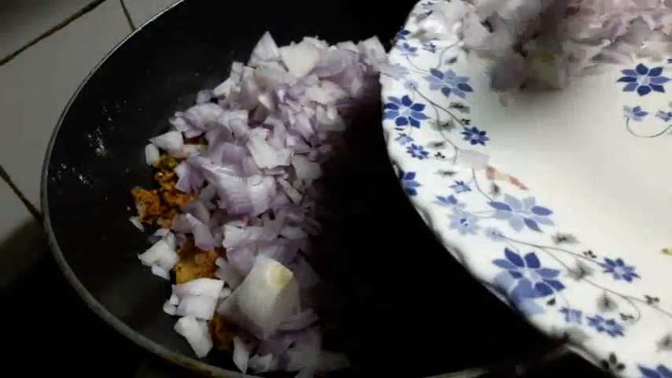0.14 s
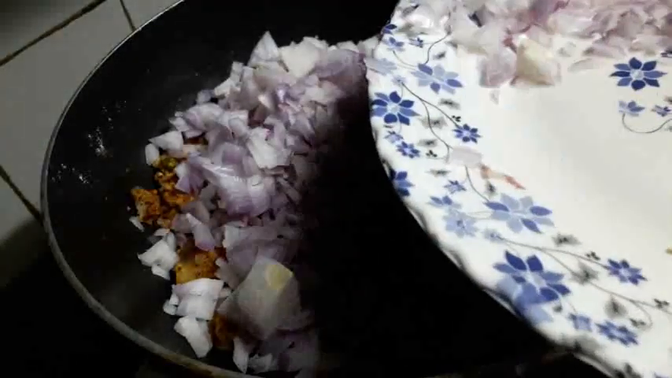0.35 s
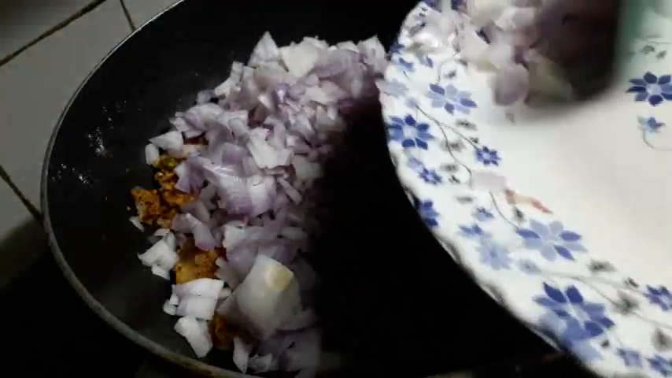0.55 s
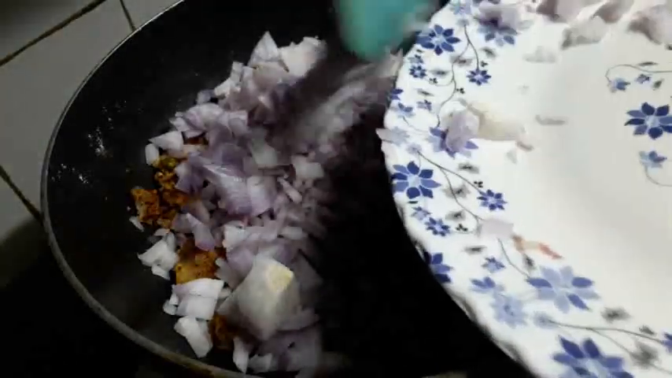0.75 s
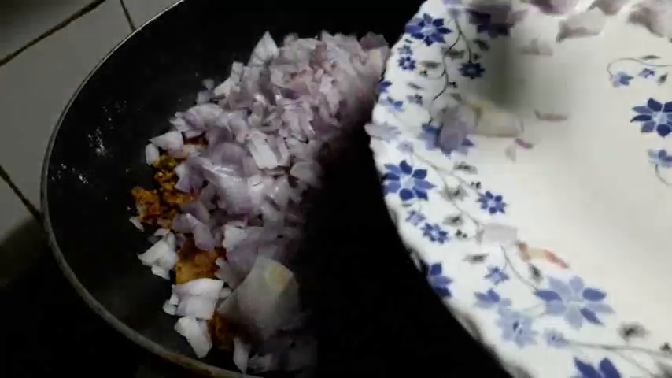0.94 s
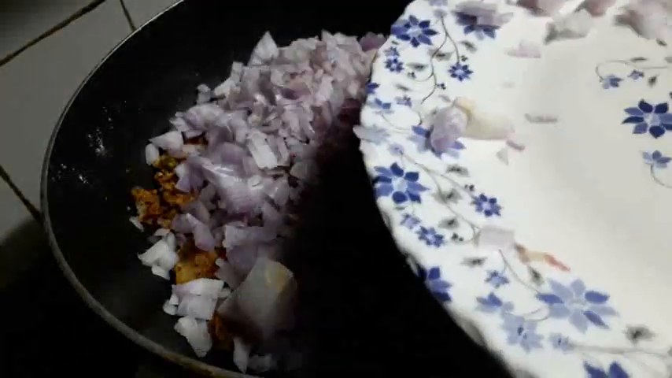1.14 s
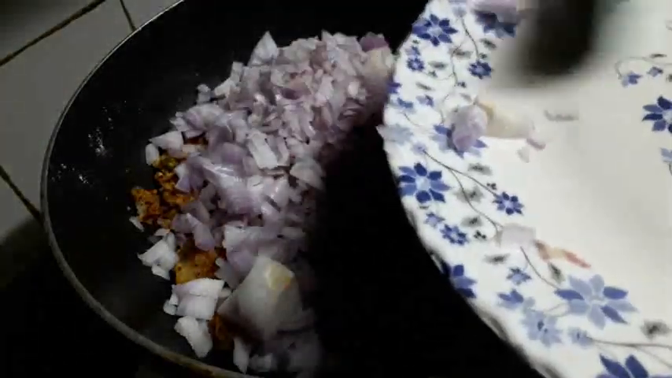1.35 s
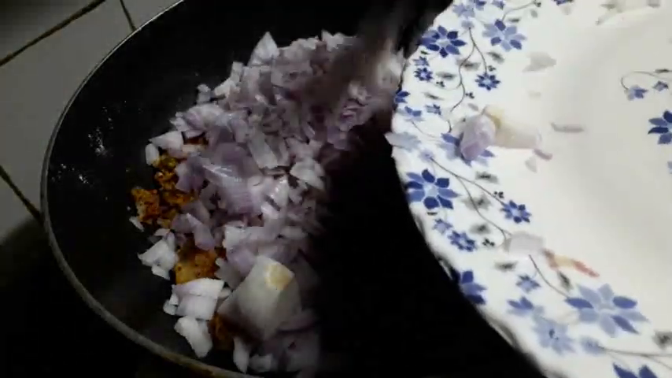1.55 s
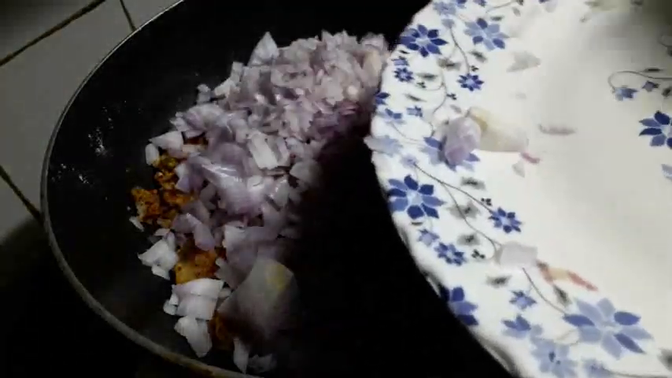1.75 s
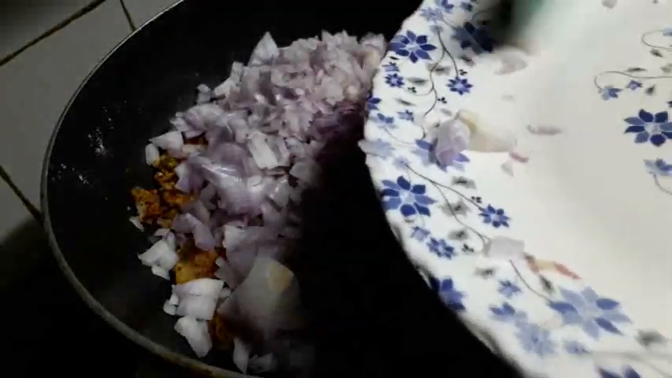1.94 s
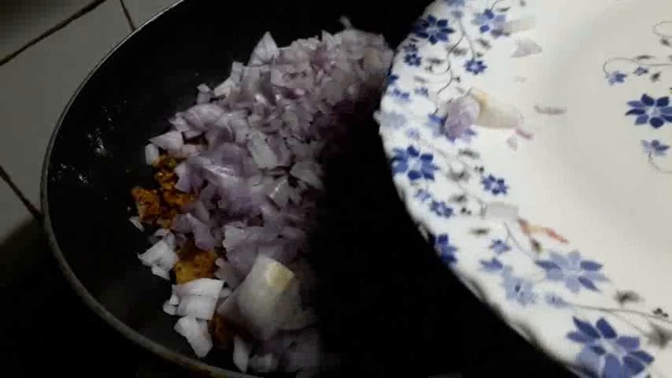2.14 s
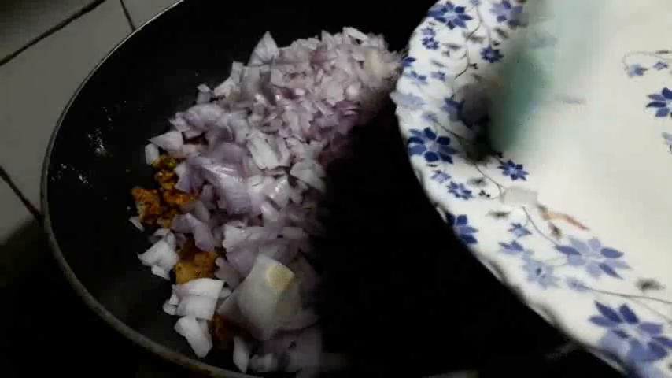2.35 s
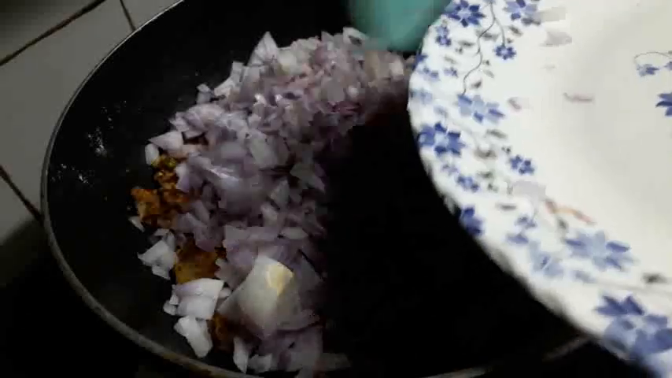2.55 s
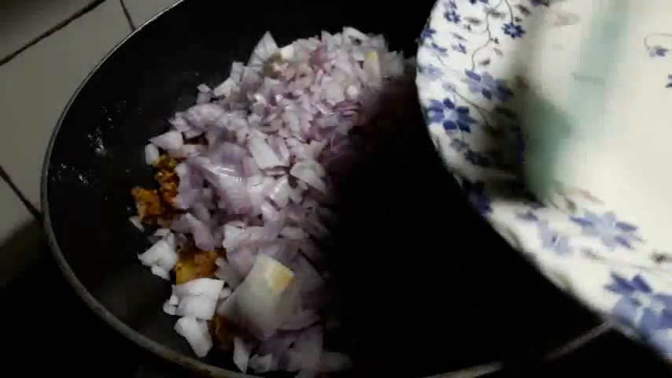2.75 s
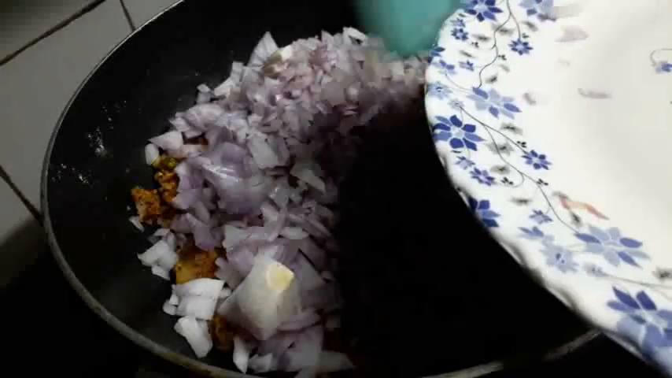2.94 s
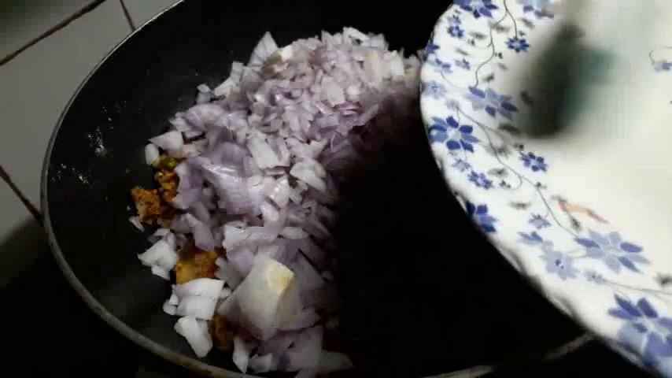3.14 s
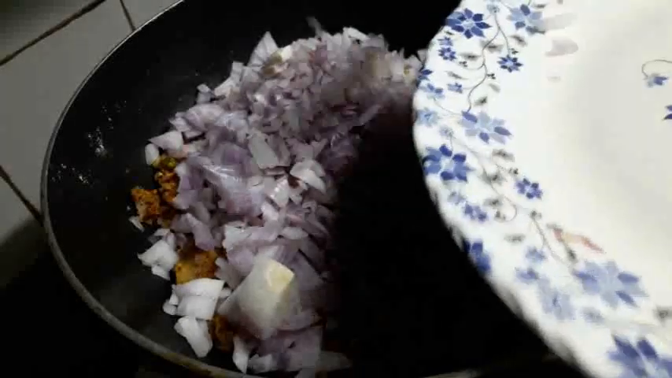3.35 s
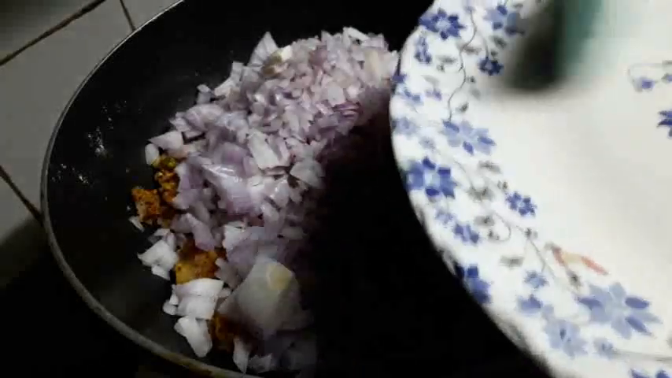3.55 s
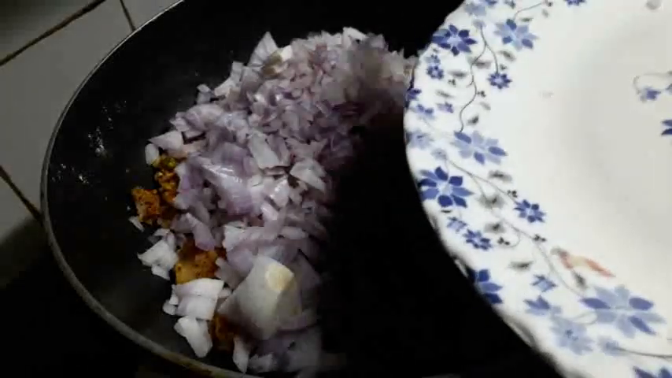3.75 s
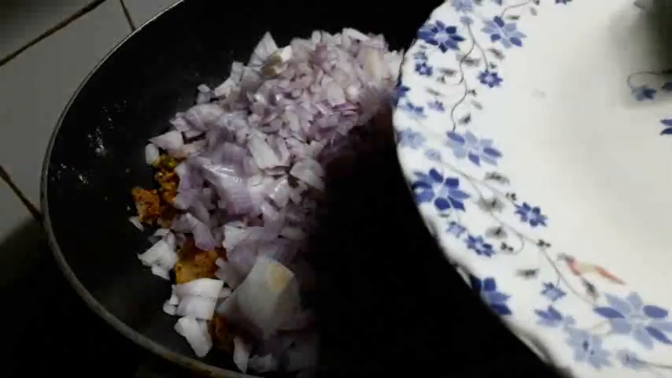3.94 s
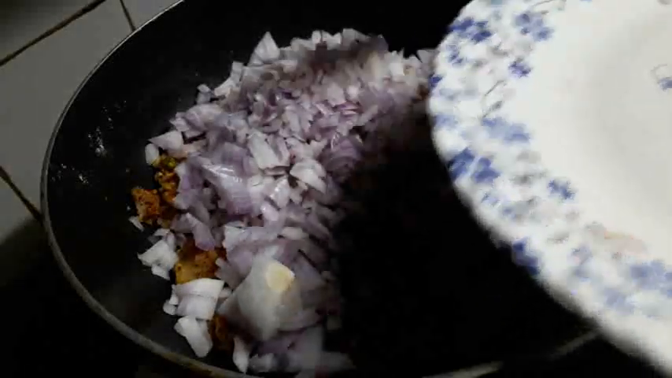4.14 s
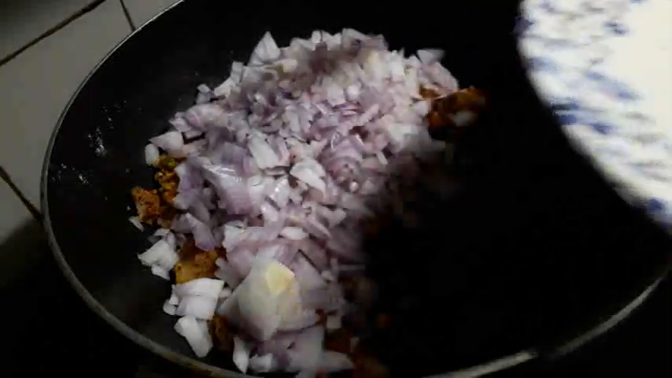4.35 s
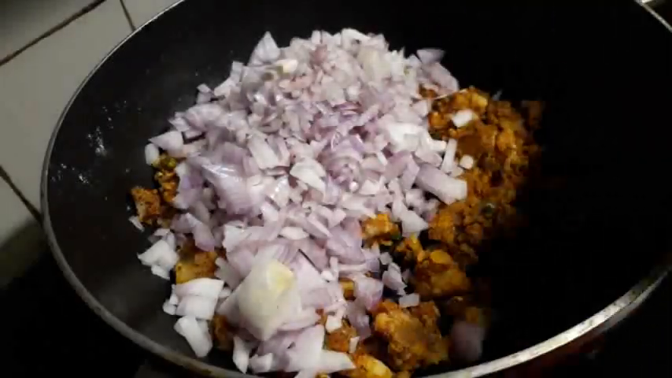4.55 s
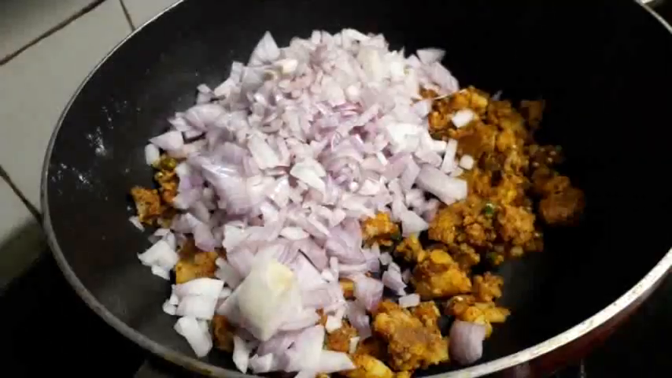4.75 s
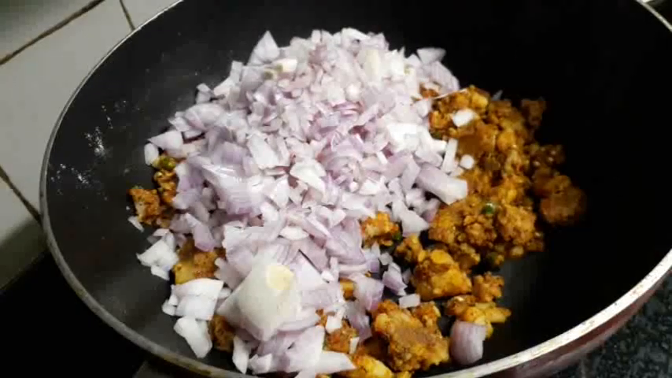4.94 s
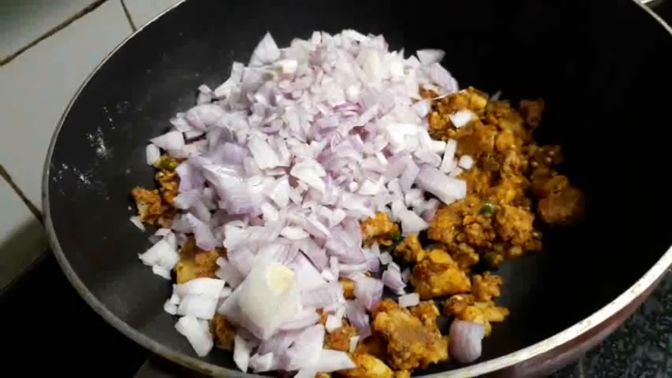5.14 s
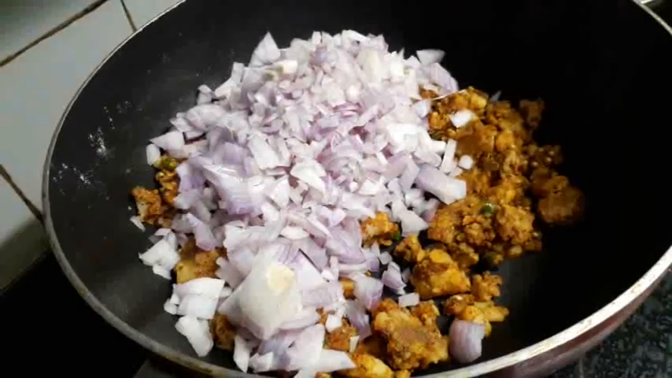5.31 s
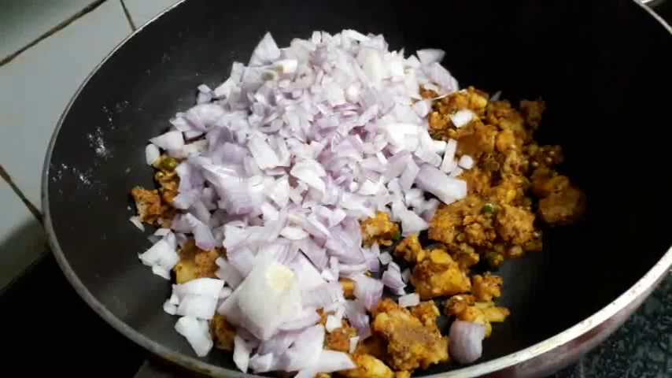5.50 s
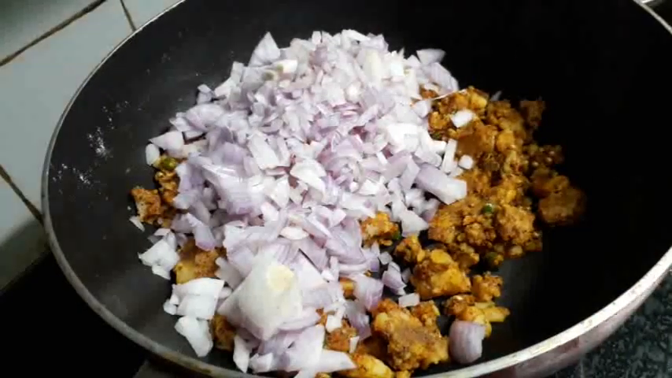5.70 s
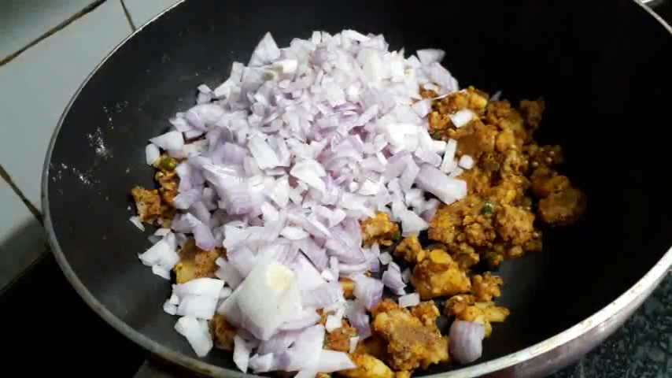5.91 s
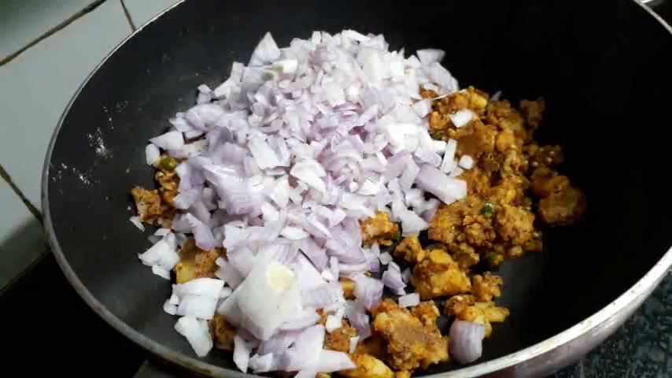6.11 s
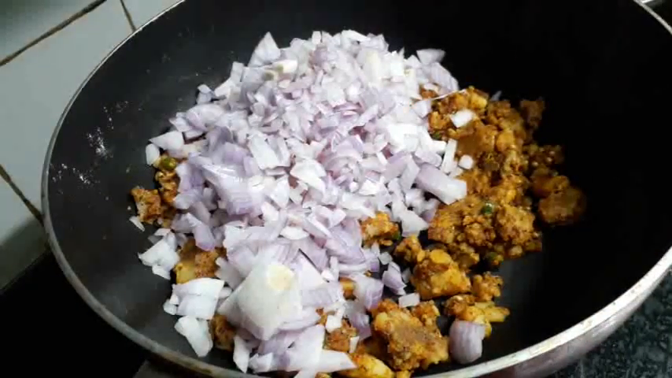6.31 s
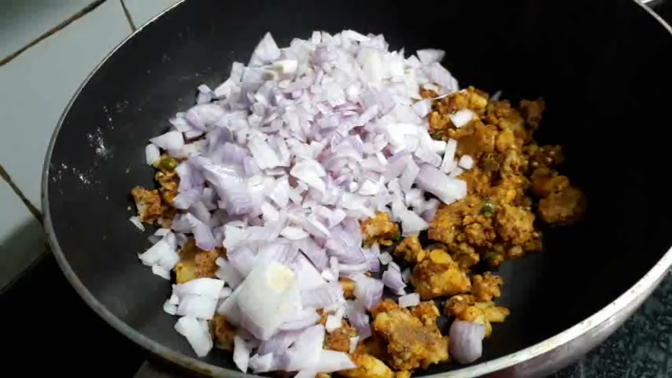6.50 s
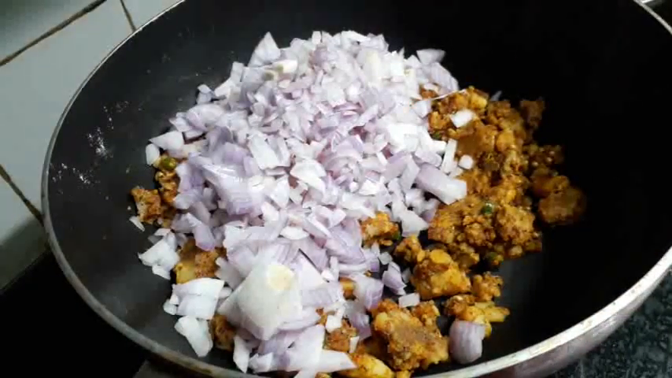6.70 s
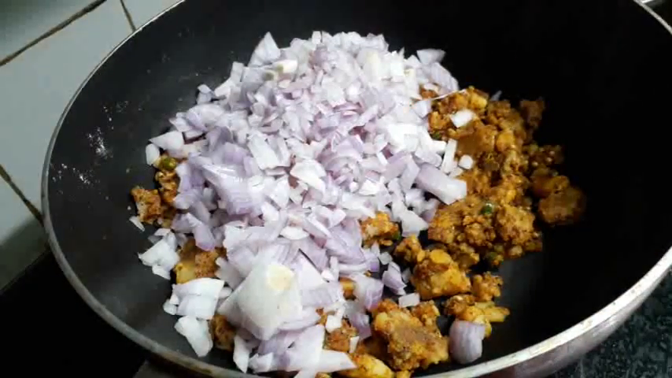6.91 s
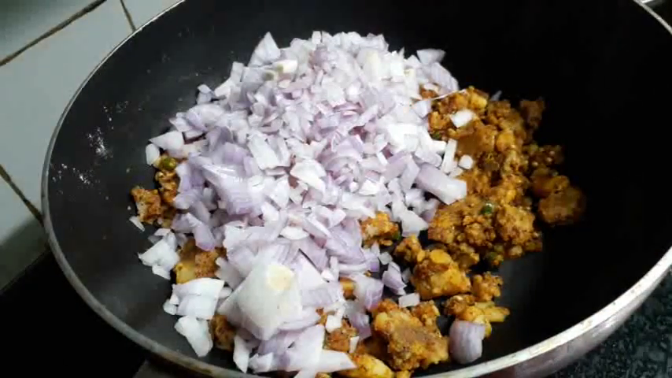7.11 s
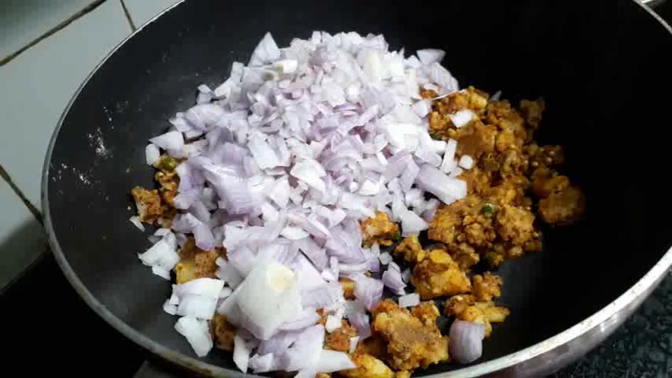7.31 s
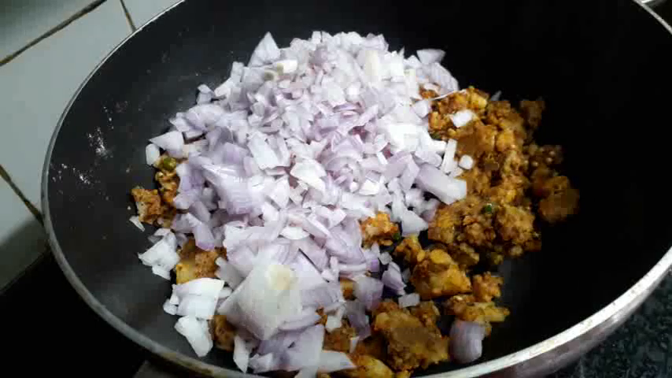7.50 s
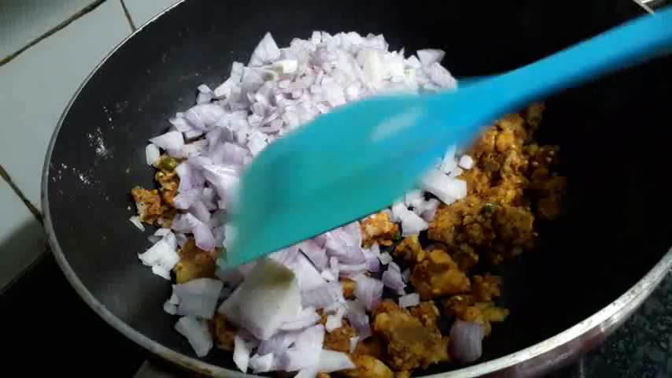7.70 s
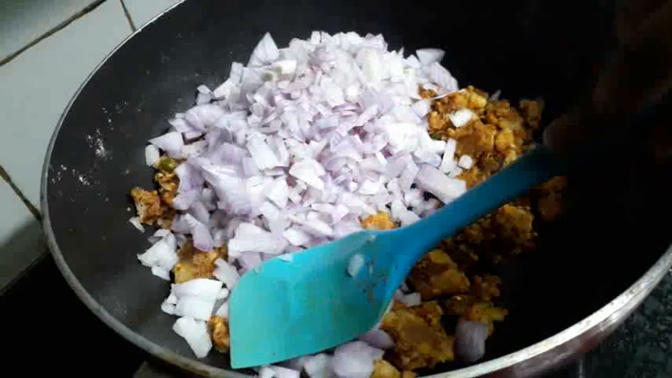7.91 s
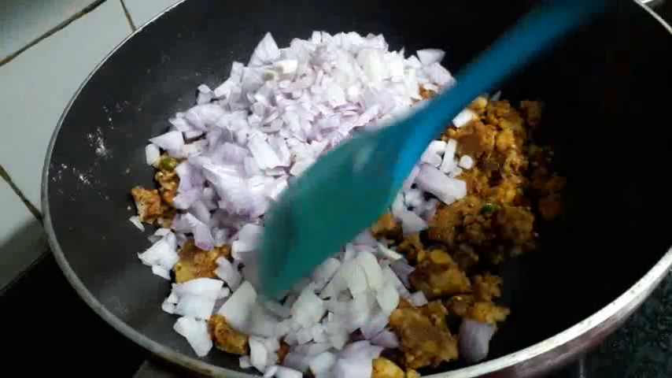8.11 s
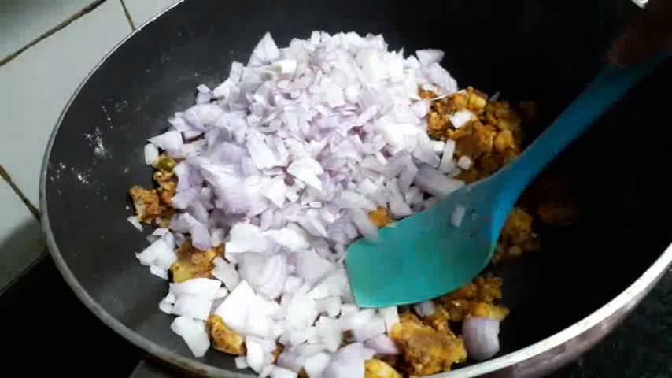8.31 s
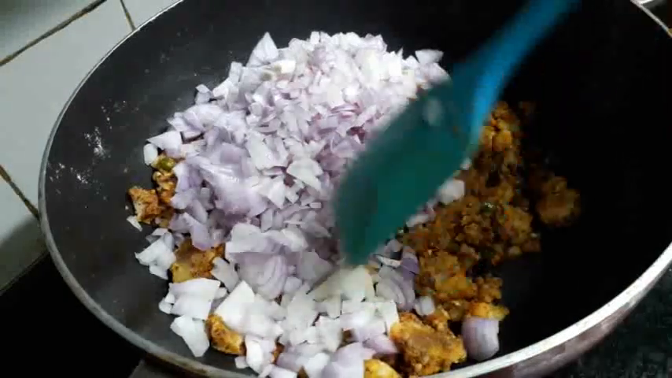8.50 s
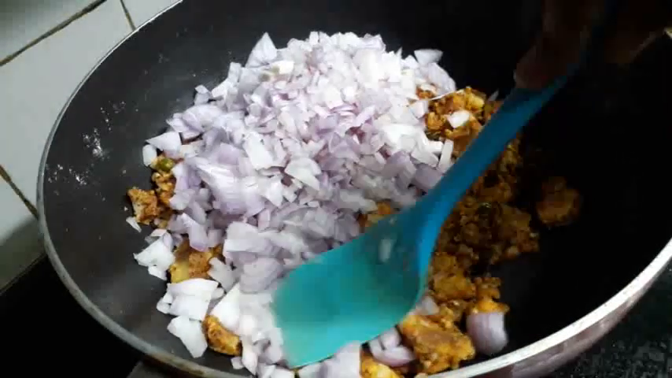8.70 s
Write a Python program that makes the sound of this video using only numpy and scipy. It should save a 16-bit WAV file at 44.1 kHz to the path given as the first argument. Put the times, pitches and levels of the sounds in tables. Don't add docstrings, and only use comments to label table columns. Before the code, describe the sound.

A low fan drone and a faint, fine-grained oil sizzle run throughout, close up in a small tiled kitchen. A soft spatula brushes a plate and scrapes it grittily around 0.4 s; a loud ceramic knock rings briefly at 0.7 s, followed by an oil spit at 0.8. Gentle landings and short scrapes continue from 1.1 to 2.3 s. Hard clanks strike at 2.4, 2.8 and 3.2 s, the last with a small bounce, among softer taps at 3.1, 3.5 and 3.9. A weaker rim double-knock and scrape come at 4.05. Near 4.5 s the plate lifts and the hiss brightens. A soft touch at 5.4 and faint raps at 5.8-5.9 precede a sharp spit at 6.7. A slide from 7.0 meets a loud dry rap at 7.2. From 7.6, thuds and crunches prod the onions, strongest at 8.7, amid frequent crackling spits from 7.9 to 8.6.

```python
import sys
import numpy as np
from scipy import signal
from scipy.fft import rfft, irfft, next_fast_len
from scipy.io import wavfile
from scipy.ndimage import uniform_filter1d

SR = 44100
rng = np.random.default_rng(int(sys.argv[2]) if len(sys.argv) > 2 else 0)


def transcribe(u):
    v = np.clip(np.atleast_2d(u).T, -1, 1)
    q = np.round(v * 32767).astype(np.int16)
    wavfile.write(sys.argv[1], SR, q)


def makeup_ratio(level_db):
    decades = np.asarray(level_db, float) / 20
    return 10 ** decades


N = 390637
T = np.arange(9000) / SR
LIFT_S = 4.48

# frequency in Hz, level in dB per Hz.
FAN_COLOUR = [(15, -47), (25, -40), (54, -6.5), (75, -27), (92, -8), (112, 4.5), (140, -3.5), (188, 0),
              (238, -12), (437, -12.5), (534, -25.5), (666, -14), (1290, -24.5), (2000, -23.5), (2600, -76),
              (4400, -120)]
# frequency in Hz, width in Hz, level in dB.
HUM_TONES = [(48.4, 3, -69.5), (107.7, 9.3, -61.5), (147.6, 6.8, -63)]
# time in seconds, level in dB.
FRY_VIGOUR = [(0.0, -52), (0.67, -47.5), (1.3, -50), (2.29, -47), (3.8, -50.5), (4.46, -48.5), (6.0, -47.5),
              (6.69, -49), (7.18, -46.5), (7.45, -48.5), (8.86, -47)]
# frequency in Hz, level in dB per Hz.
FRY_COLOUR = [(530, -4.5), (900, -9), (1290, -10.5), (2040, -6), (4800, 3.5), (8250, 2), (10400, -11),
              (12400, -8), (15100, -19.5), (16000, -42)]
# frequency in Hz, t60 in seconds, level in dB when struck at the centre, half way,
# at the rim, and when touched softly.
PLATE_MODES = [(147, 0.044, -9, -11, -13, -13), (269, 0.04, -12, -9, -8, -13),
               (350.6, 0.17, -4.5, -8, -8.5, 0.0), (469, 0.079, -9.5, -8.5, -23, -8),
               (590.5, 0.12, -10, -5, -6, -7), (724, 0.03, 8, 3.5, 2.5, -1),
               (812, 0.083, -2, -6, -2, -13.5), (871, 0.095, -4, -8.5, -8, -18),
               (1105, 0.17, -26, -19, -15, -29), (1373, 0.06, -2, -1.5, 4.5, -16),
               (1587, 0.052, -32, -4.5, -7, -27), (1882, 0.069, 0.5, 3, 0.5, -19),
               (2033, 0.08, -9, -8.5, -6, -24.5), (2432, 0.045, 6, -2.5, -22, -26)]
# frequency in Hz, t60 in seconds, level in dB.
UPPER_MODES = [(1604, 0.066, -16), (2264, 0.044, -13), (2870, 0.055, -11.5), (3150, 0.065, -12),
               (3505, 0.033, -7.5), (3804, 0.11, -18.5), (4510, 0.032, -14), (5450, 0.076, -17.5),
               (5905, 0.059, -14)]
UPPER_GAIN_DB = [-2.5, -1, -6, -18]
MODE_FAMILIES = [(1000, 9000), (0, 300), (300, 400), (400, 1000)]
# time in seconds, body level in dB, upper modes in dB.
BRUSHES = [(0.158, -53, -39), (0.4953, -54, -44), (0.6095, -47, -46), (1.254, -54, -38),
           (1.3486, -56, -45.5), (1.4347, -63, -53), (1.5908, -44.5, -42), (1.6706, -49, -47),
           (1.7739, -39.5, -40), (1.8923, -51, -38), (1.931, -56, -42), (2.657, -48, -33.5),
           (5.4396, -52, -32.5), (3.4759, -39, -44), (3.499, -46.5, -42), (4.175, -50, -45),
           (4.6013, -42, -43), (4.6571, -52, -37.5)]
# time in seconds, flexing level in dB, body and thump in dB
LANDINGS = [
    (0.3189, -42.5, 1, -3.5, 0.7),
    (1.1115, -29.5, -8, -12, 1.1),
    (1.75, -26.5, -9, -18, 1.05),
    (2.2503, -31.5, -0.5, -6.5, 1.6),
    (2.6569, -40, -5, 5, 0.91),
    (3.055, -26, -6.5, -13.5, 1.75),
    (3.4517, -25, -10, -14, 1.13),
    (3.8736, -32.5, -5, -14, 1.1),
    (3.8971, -39, -13, -15, 1.05),
    (5.439, -27, -0.5, -7, 1.4),
]
# start, hardest moment and end in seconds, level in dB at the hardest.
PLATE_STROKES = [
    (0.36, 0.44, 0.58, -45.5),
    (0.6, 0.63, 0.69, -56),
    (1.17, 1.2, 1.26, -47),
    (1.24, 1.262, 1.42, -54),
    (1.42, 1.44, 1.4, -54),
    (1.84, 1.895, 2.02, -51),
    (2.27, 2.285, 2.6, -51.5),
    (3.99, 4.03, 4.5, -50),
    (4.58, 4.606, 4.27, -44),
    (4.64, 4.666, 4.45, -53),
]
# frequency in Hz, width in Hz, level in dB.
RUBBED_PLATE = [(353, 130, 0.5), (600, 100, -4), (760, 91, 2.5), (970, 180, -3.5), (1265, 310, -4.5),
                (1430, 120, -4), (1860, 55, -1), (2430, 180, -10.5)]
# time in seconds, level in dB, centre in Hz, t60 in seconds.
SPITS = [(0.572, -37, 3300, 0.02), (0.5831, -33, 3150, 0.028), (0.8089, -20, 5500, 0.048),
         (4.8183, -23, 6260, 0.03), (5.66, -32, 4000, 0.054), (6.673, -17, 8900, 0.069),
         (6.7313, -31, 5750, 0.03), (7.148, -25, 9500, 0.079), (7.2933, -36, 5700, 0.025),
         (7.446, -31, 6000, 0.033), (7.592, -28.5, 5040, 0.069), (7.953, -24, 5470, 0.03),
         (8.019, -37, 5740, 0.03), (8.04, -34, 4090, 0.026), (8.105, -16, 3900, 0.021),
         (8.131, -27, 5450, 0.052), (8.149, -16.5, 9900, 0.061), (8.285, -44, 3000, 0.03),
         (8.284, -22.5, 4300, 0.023), (8.319, -26, 6480, 0.023), (8.4761, -26, 5920, 0.037),
         (8.5865, -19.5, 6450, 0.029)]
# time in seconds, level in dB, crack level in dB, share of ring left
KNOCKS = [
    (0.677, 1, -19, 1, 0.05),
    (2.3876, -1.5, -18, 1, 0.89),
    (2.807, -1, -9.5, 0.95, 0.93),
    (3.1684, 0.5, -11.5, 1, 1.16),
    (3.193, -14, -30, 0.99, 1.5),
    (4.045, -10, -31.5, 0.86, 2.2),
    (4.057, -13.5, -39, 0.93, 2.13),
]
# time in seconds, level in dB, crack level in dB, pitch factor of the part that lands.
RAPS = [
    (5.8326, -35, -36, 1.17),
    (5.899, -33.5, -38, 0.8),
    (7.2176, -0.5, -25, 1.001),
]
# frequency in Hz, level in dB, t60 in seconds.
SPATULA_MODES = [(290, -15.5, 0.073), (1070, -20, 0.069), (1372, -1.5, 0.069), (1466, 3, 0.026),
                 (1550, -5.5, 0.028), (1717, -4, 0.064), (1825, -4, 0.05), (1990, -1, 0.033),
                 (2500, -23, .040), (2488, -1, 0.035), (3050, -16, 0.041), (3440, -19, 0.029),
                 (4105, -9., 0.032), (6240, -16, 0.036)]
# start, hardest moment and end in seconds, level in dB at the hardest.
WORKTOP_STROKES = [
    (7.0, 7.1, 7.135, -49),
    (7.128, 7.142, 7.2, -41),
]
# frequency in Hz, width in Hz, level in dB.
WORKTOP = [(1450, 270, -2), (1900, 400, -0.5), (2500, 500, -5), (3300, 900, -0.5)]
# time in seconds, level in dB, length in seconds, crunch level in dB,
# crispness in dB.
PRODS = [
    (7.597, -41, 0.055, -3, 0),
    (7.827, -27.5, 0.033, 0, -9.5),
    (8.071, -28, 0.049, -4.5, -8),
    (8.21, -38, 0.052, -10, -14),
    (8.271, -33, 0.042, 1, -22),
    (8.659, -20.5, 0.049, -5, -16),
    (8.762, -24.5, 0.055, -1.5, -6.5),
]
# frequency in Hz, width in Hz, level in dB.
PAN = [(288, 87, -4), (494, 35, 2), (730, 170, -3.5), (960, 48, 5), (1255, 220, -5.5), (1530, 190, -4),
       (2320, 1640, -16)]
# frequency in Hz, t60 in seconds.
KITCHEN = [(350, 0.3), (1500, 0.14), (5000, 0.15)]
# frequency in Hz, share of moments before 4.48 s, # share
FLIPPED = [(8600, .02, .03), (9300, .35, .06), (10700, .68, .16), (12700, .68, .1), (13400, .45, .3),
           (14100, .15, .65), (14800, .08, .75)]


def level(x, db):
    return x * makeup_ratio(db) / np.sqrt(np.mean(x ** 2))


def band(x, lo_hz, hi_hz):
    return signal.sosfilt(signal.butter(2, [lo_hz, min(hi_hz, 0.45 * SR)], "band", fs=SR, output="sos"), x)


def colour(x, points):
    hz, db = np.transpose(points)
    size = next_fast_len(len(x))
    f = np.maximum(np.fft.rfftfreq(size, 1 / SR), 1)
    gain = makeup_ratio(np.interp(np.log(f), np.log(hz), db))
    return irfft(rfft(x, size) * gain, size)[:len(x)]


def resonate(x, peaks):
    out = 0
    for k, (hz, width_hz, db) in enumerate(peaks):
        out = out + (-1) ** k * makeup_ratio(db) * signal.lfilter(*signal.iirpeak(hz, hz / width_hz, SR), x)
    return out


def walk(rate_hz):
    k = int(SR / rate_hz)
    steps = np.repeat(rng.standard_normal(N // k + 1), k)
    return uniform_filter1d(uniform_filter1d(steps, k), k)[:N]


def grit(rate_hz, spread_db, count):
    size = makeup_ratio(spread_db * np.minimum(rng.exponential(size=count), 3.5))
    return (rng.random(count) < rate_hz / SR) * size * rng.standard_normal(count)


def add(track, s, x):
    i = int(s * SR)
    track[i:i + len(x)] += x[:N - i]


def fade(t60_s):
    return np.exp(-np.log(1000) * T / np.maximum(t60_s, 0.003))


def ring(hz, db, t60_s, chance, spot_db):
    hz, db, t60_s, a, b = (np.reshape(v, (-1, 1)) for v in (hz, db, t60_s, *chance))
    sign = (-1) ** np.arange(len(hz))[:, None]
    muffle = 0.086 + 1.5 * np.exp(-(T / (0.38 * np.maximum(t60_s, 0.003))) ** 2)
    wave = np.sin(2 * np.pi * hz * (1 + 0.004 * b) * T)
    x = np.sum(sign * makeup_ratio(db + spot_db * a) * fade(t60_s) * muffle * wave, axis=0)
    x = x * np.minimum(T / 0.00067, 1)
    return x / np.abs(x).max()


def crack(lo_hz, hi_hz, t60_s, tail_db, tail_t60_s):
    decay = fade(t60_s) + makeup_ratio(tail_db) * fade(tail_t60_s)
    x = band(rng.standard_normal(len(T)), lo_hz, hi_hz) * decay
    return x / np.abs(x).max()


def snap(length_s):
    return np.sin(2 * np.pi * np.minimum(T / length_s, 1))


def struck(spot):
    blade = [(hz, t60_s, *(db + np.array(UPPER_GAIN_DB))) for hz, t60_s, db in UPPER_MODES]
    return np.transpose([(hz, t60_s, np.interp(spot, range(len(db)), db))
                         for hz, t60_s, *db in PLATE_MODES + blade])


def drag(strokes, peaks, press_db, ease_db, hiss_db):
    t = np.arange(N) / SR
    slips = grit(4000, 1.6, N)
    body = level(resonate(slips, peaks), 0)
    hiss = level(band(slips, 1330, 6100), 0)
    push = 0
    for start_s, hardest_s, end_s, db in strokes:
        touch = np.clip(np.minimum((t - start_s) / 0.0099, (end_s - t) / 0.0033), 0, 1)
        moments_s = [start_s, hardest_s, max(end_s, hardest_s + 0.001)]
        push = push + touch * makeup_ratio(db - np.interp(t, moments_s, [press_db, 0, ease_db]))
    return band(push * (body + makeup_ratio(hiss_db) * hiss) * makeup_ratio(2.4 * walk(30)), 150, 8900)


def fan():
    drone = colour(rng.standard_normal(N), FAN_COLOUR)
    low = band(drone, 20, 340)
    wavering = low * makeup_ratio(1.2 * walk(4.3)) + (drone - low) * makeup_ratio(1.2 * walk(4.15))
    tones = sum(level(resonate(rng.standard_normal(N), [(hz, width_hz, 0)]), db)
                for hz, width_hz, db in HUM_TONES)
    return level(wavering, -52.5) + tones


def fry():
    t = np.arange(N) / SR
    lifted = np.clip((t - LIFT_S) / 0.083, 0, 1)
    bubbles = level(rng.standard_normal(N), 0) + level(grit(1500, 2.5, N), -6)
    hiss = level(colour(bubbles, FRY_COLOUR), 0.83) * makeup_ratio(0.82 * walk(12))
    top_shaded_db, top_open_db = 4, 5.5
    top_gain = makeup_ratio(top_shaded_db + lifted * (top_open_db - top_shaded_db)) - 1
    hiss = hiss + top_gain * band(hiss, 8920, 18100)
    self_noise = level(band(rng.standard_normal(N), 13700, 13800), -68)
    x = makeup_ratio(np.interp(t, *np.transpose(FRY_VIGOUR)) + 3.5 * lifted) * hiss + self_noise
    return signal.sosfilt(signal.ellip(10, 0.2, 90, 15150, fs=SR, output="sos"), x)


def touches():
    rows = []  # s, dB of upper modes, thump, flexing and body, share of ring left
    for s, db, body_db, thump_db, grip in LANDINGS:
        rows.append((s, db + body_db + 0.4, db + thump_db, db, db + body_db, grip))
    for s, db, upper_db in BRUSHES:
        rows.append((s, upper_db, db - 15, db - 6, db, 1.27))
    rows.sort()
    trims_db, ring_shares = [0, 10, 4, 3.5], [0.79, 0.9, 0.95, 1.06]
    hz, t60_s, mode_db = struck(3)
    out = np.zeros(N)
    chance = rng.standard_normal((len(rows), 2, len(hz)))
    for (s, *family_db, grip), c in zip(rows, chance):
        add(out, s, makeup_ratio(family_db[0] - 1) * crack(1000, 5500, 0.028, -18, 0.05))
        for db, trim_db, share, (lo_hz, hi_hz) in zip(family_db, trims_db, ring_shares, MODE_FAMILIES):
            k = (hz >= lo_hz) & (hz < hi_hz)
            modes = ring(hz[k], mode_db[k], share * grip * t60_s[k], c[:, k], 4.8)
            add(out, s + 0.0006, makeup_ratio(db + trim_db) * modes)
    return out


def plate_scrapes():
    return drag(PLATE_STROKES, RUBBED_PLATE, press_db=12, ease_db=15.5, hiss_db=-8)


def spits():
    out = np.zeros(N)
    for s, db, hz, t60_s in SPITS:
        burst = rng.standard_normal(len(T)) * (fade(0.0026) + 0.5 * fade(t60_s))
        x = band(burst, 0.58 * hz, 1.68 * hz)
        airy = band(burst, 11000, 15000)
        add(out, s, makeup_ratio(db) * (x / np.abs(x).max() + makeup_ratio(-11) * airy / np.abs(airy).max()))
    return out


def knocks():
    out = np.zeros(N)
    chance = rng.standard_normal((len(KNOCKS), 2, len(PLATE_MODES + UPPER_MODES)))
    for (s, db, crack_db, grip, spot), c in zip(KNOCKS, chance):
        hz, t60_s, mode_db = struck(spot)
        body = ring(hz, mode_db, grip * t60_s, c, 1) + makeup_ratio(-8) * crack(290, 3550, 0.05, -9, 0.079)
        bright = makeup_ratio(crack_db + 2.5) * crack(3700, 8550, 0.024, -14.5, 0.054)
        add(out, s + 0.00048, makeup_ratio(db - 2.5) * (body + 0.8 * snap(0.0005)) + bright)
    return out + makeup_ratio(-14.5) * np.roll(out, int(0.002794 * SR))


def raps():
    out = np.zeros(N)
    chance = rng.standard_normal((len(RAPS), 2, len(SPATULA_MODES)))
    choke = np.clip((0.024 - T) / 0.0091, 0.2, 1)
    hz, mode_db, t60_s = np.transpose(SPATULA_MODES)
    for (s, db, crack_db, pitch), c in zip(RAPS, chance):
        body = choke * ring(pitch * hz, mode_db, t60_s, c, 0.79)
        body = body + makeup_ratio(-11.5) * crack(780, 2500, 0.055, -15, 0.1) + 0.84 * snap(0.00049)
        bright = makeup_ratio(crack_db + 0.5) * crack(3400, 7800, 0.039, -16, 0.11)
        add(out, s + 0.00036, makeup_ratio(db - 2.1) * body + bright)
    return out


def worktop_slide():
    return drag(WORKTOP_STROKES, WORKTOP, press_db=5, ease_db=2.5, hiss_db=-4)


def prods():
    out = np.zeros(N)
    for s, db, length_s, crunch_db, crisp_db in PRODS:
        bits = level(grit(2500, 2.6, len(T)), 0) * np.clip((length_s - T) / 0.02, 0, 1)
        blow = rng.standard_normal(len(T)) * fade(0.019)
        thud = resonate(makeup_ratio(crunch_db - 7) * bits + blow, PAN)
        crisp = makeup_ratio(crisp_db - 3.5) * band(bits, 1900, 5900)
        add(out, s, makeup_ratio(db) * (0.85 * thud / np.abs(thud).max() + crisp))
    return out


def kitchen(x, wet_db):
    tail = sum(band(rng.standard_normal(len(T)), hz / 2.63, hz * 1.8) * fade(t60_s) for hz, t60_s in KITCHEN)
    tail = tail * np.clip((T - 0.006) / 0.0052, 0, 1)
    return x + makeup_ratio(wet_db) * signal.fftconvolve(x, tail / np.sqrt(np.sum(tail ** 2)))[:N]


def scene():
    contacts = touches() + plate_scrapes() + knocks() + raps() + worktop_slide() + prods()
    mono = fan() + fry() + kitchen(contacts + spits(), wet_db=-20)
    return np.array([mono, mono])


def flip_quiet_treble(x):
    f, t, z = signal.stft(x, SR, nperseg=1024, noverlap=768)
    edge_hz, early, late = np.transpose(FLIPPED)
    width_hz = 690
    for hz in np.arange(8600, 15400, width_hz):
        k = (f >= hz) & (f < hz + width_hz)
        power = uniform_filter1d(np.mean(np.abs(z[k]) ** 2, axis=0), size=8)
        db = 10 * np.log10(power + 1e-14)
        quiet = db < uniform_filter1d(db, size=200) + 5
        share = np.where(t < LIFT_S, np.interp(hz, edge_hz, early), np.interp(hz, edge_hz, late))
        luck = np.repeat(rng.random(len(t) // 10 + 1), 10)[:len(t)]
        z[k] = z[k] * np.where(quiet & (luck < share), -1, 1)
    return signal.istft(z, SR, nperseg=1024, noverlap=768)[1][:N]


def roll_off(x):
    return signal.sosfilt(signal.butter(12, 16470, fs=SR, output="sos"), x)


def record(dry):
    x = signal.sosfilt(signal.butter(4, 40, "high", fs=SR, output="sos"), dry[0])
    x = 1.3 * np.tanh(x / 1.3)
    x = signal.sosfilt(signal.ellip(8, 0.2, 70, 16300, fs=SR, output="sos"), x)
    return roll_off(np.array([x, flip_quiet_treble(x)]))


dry = scene()
out = record(dry)
transcribe(out)
```